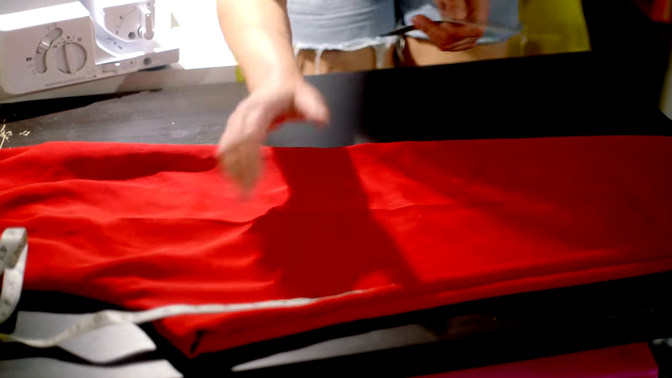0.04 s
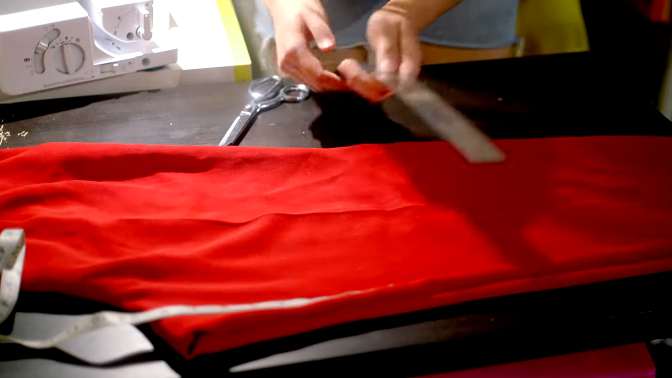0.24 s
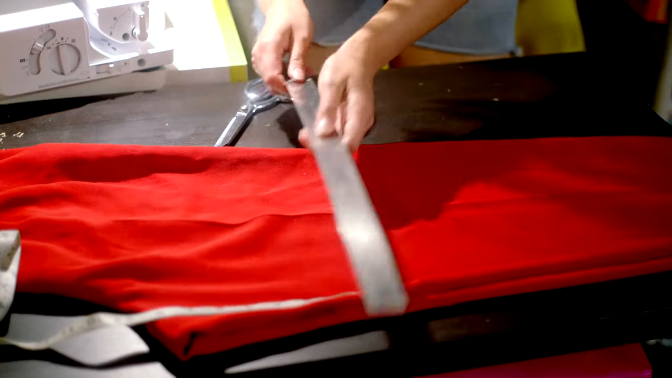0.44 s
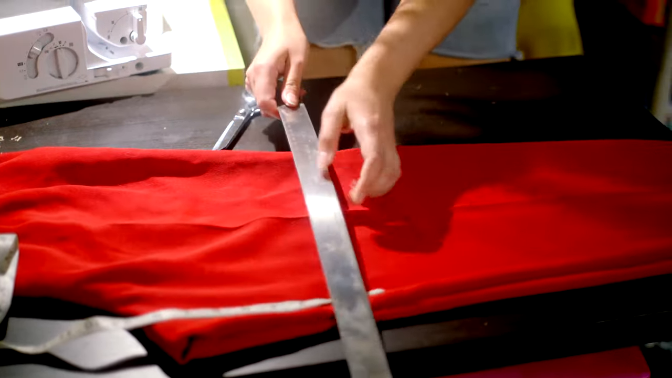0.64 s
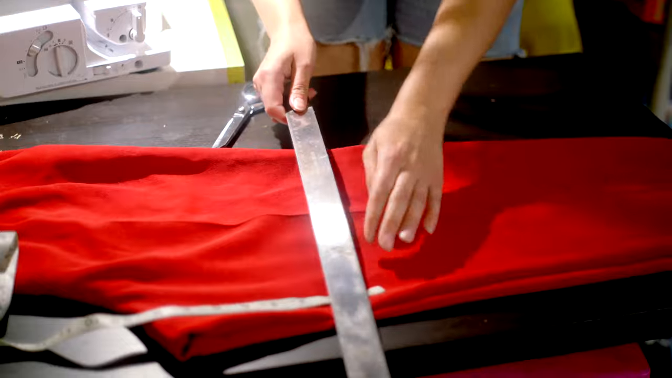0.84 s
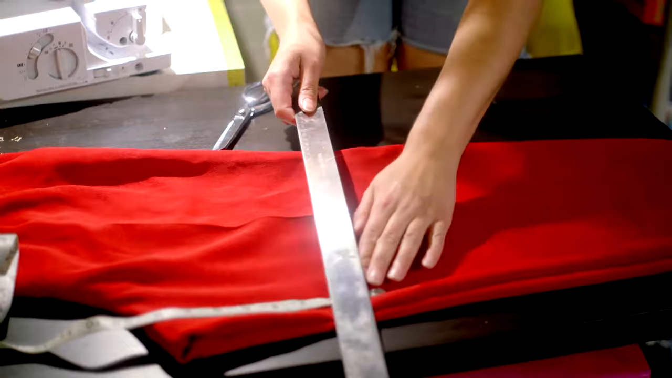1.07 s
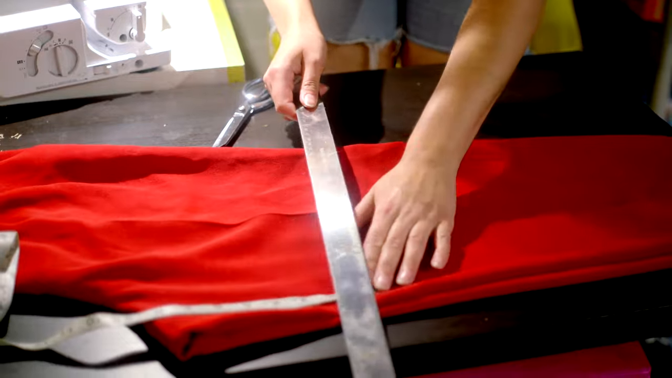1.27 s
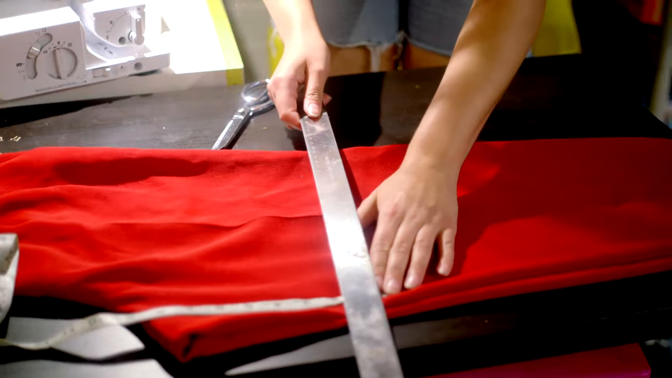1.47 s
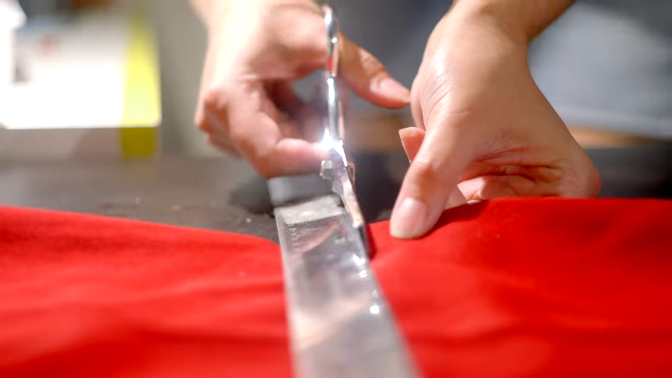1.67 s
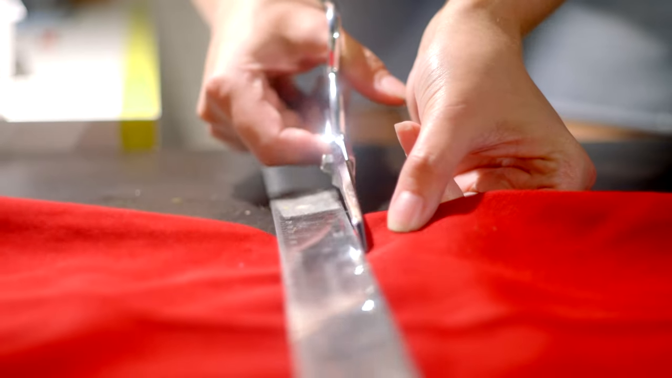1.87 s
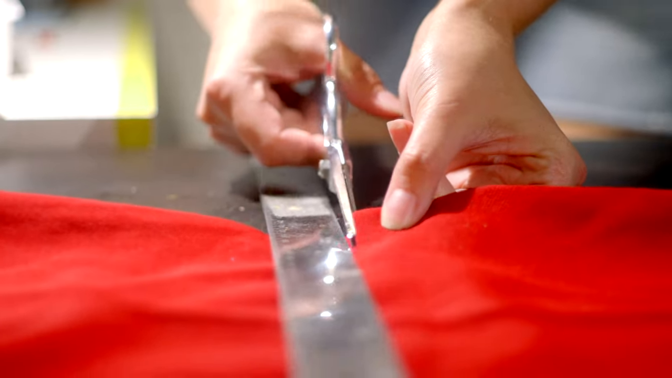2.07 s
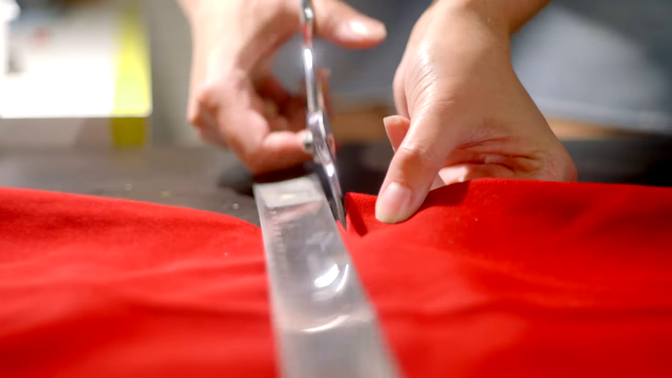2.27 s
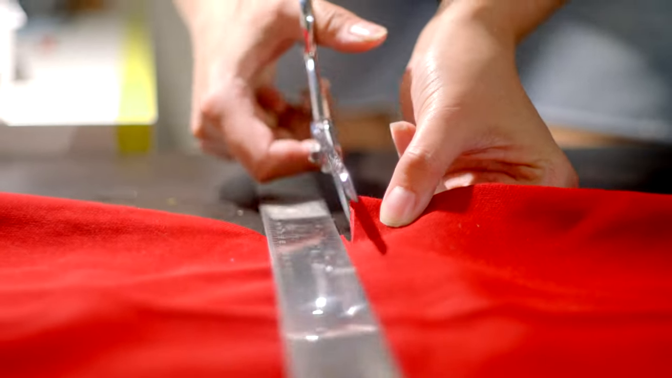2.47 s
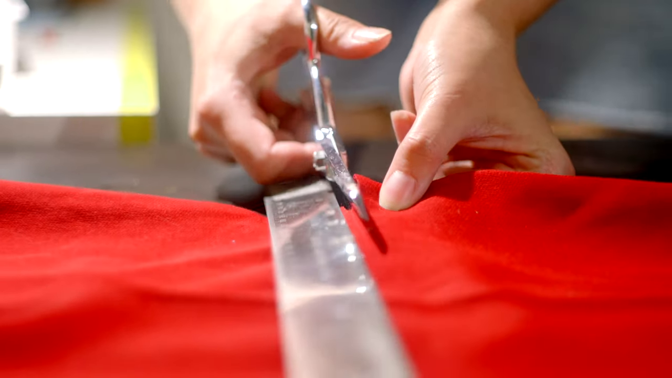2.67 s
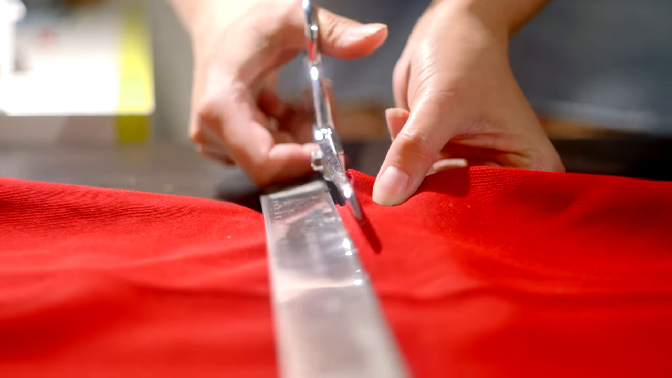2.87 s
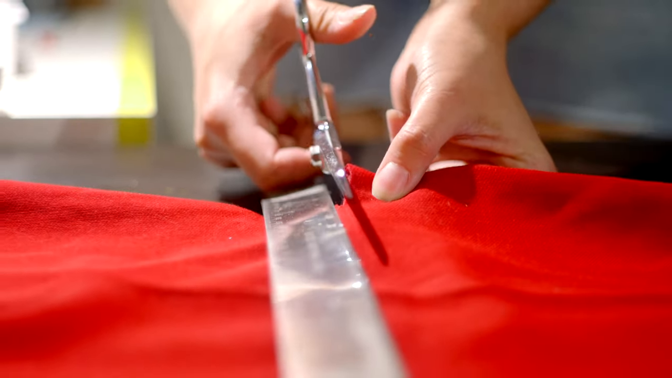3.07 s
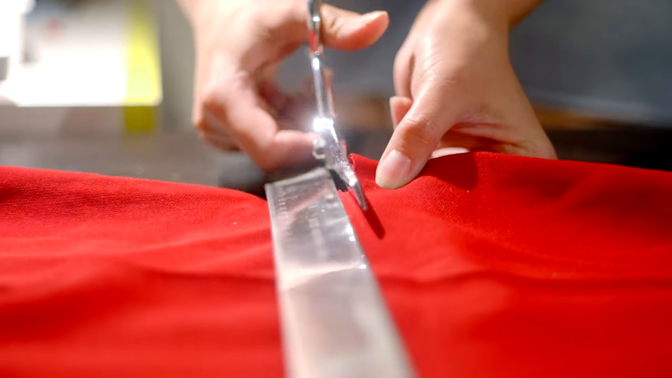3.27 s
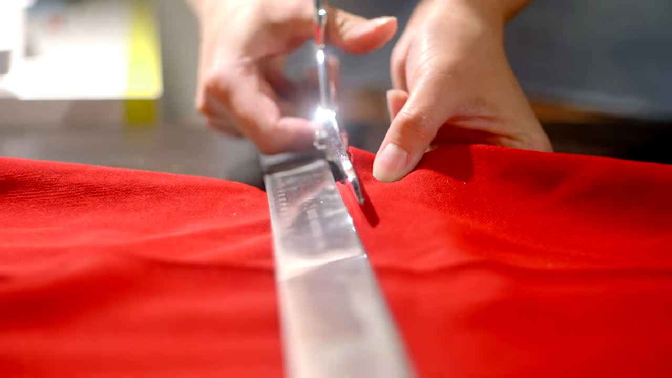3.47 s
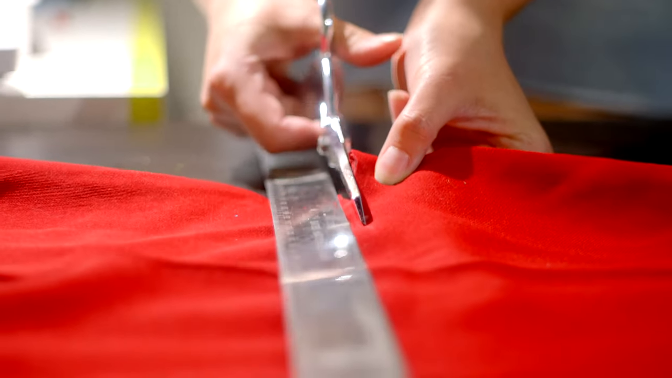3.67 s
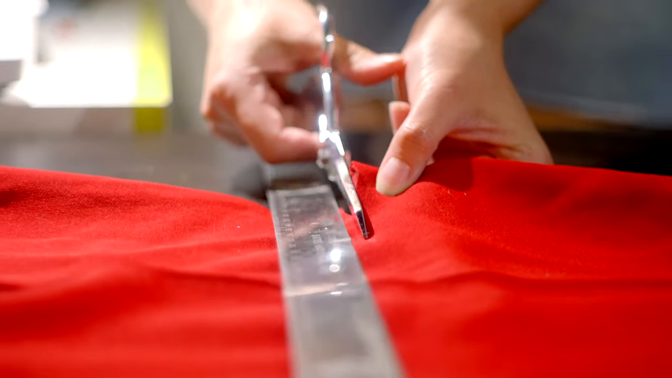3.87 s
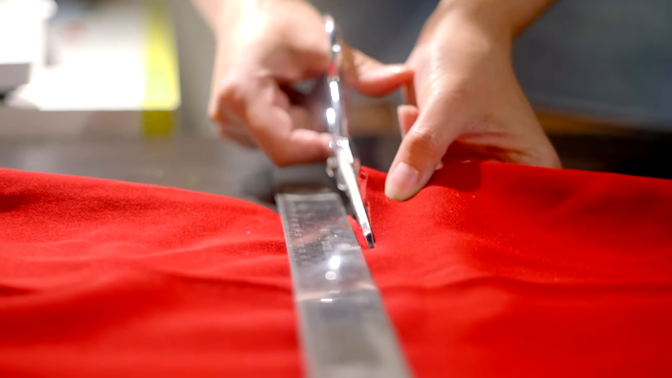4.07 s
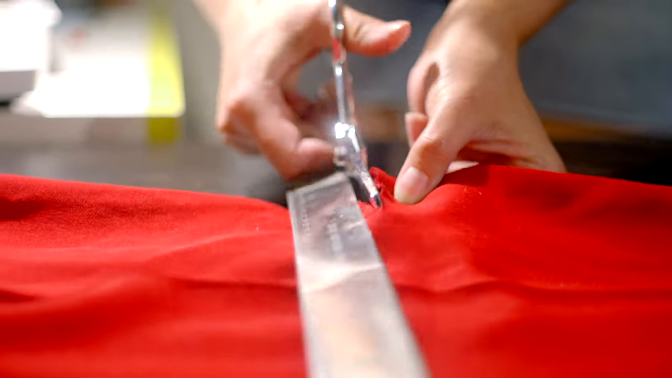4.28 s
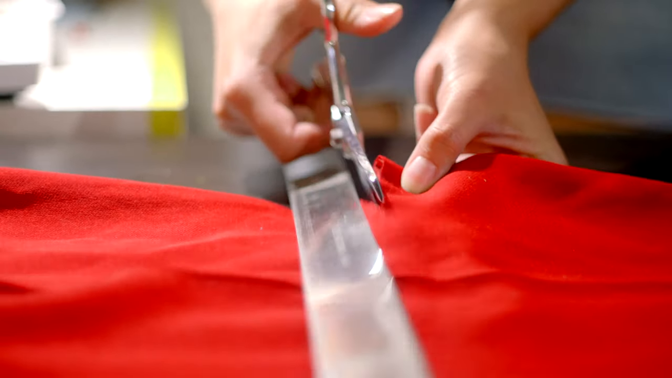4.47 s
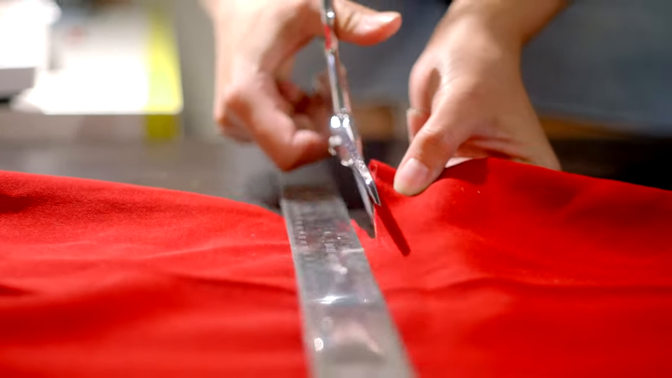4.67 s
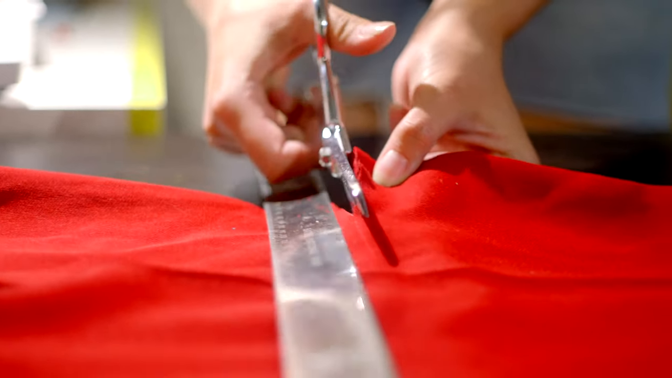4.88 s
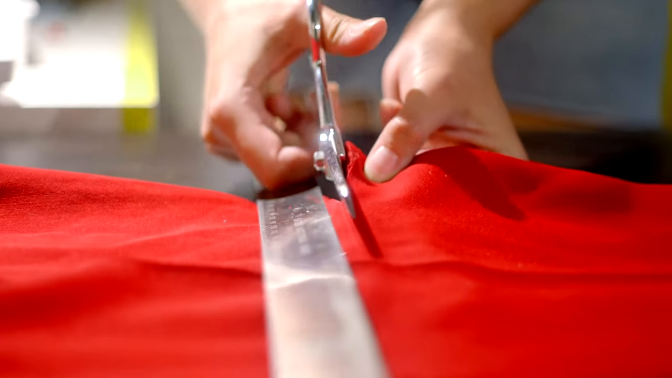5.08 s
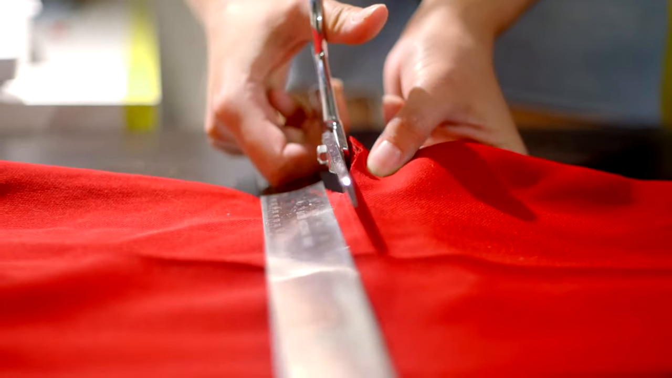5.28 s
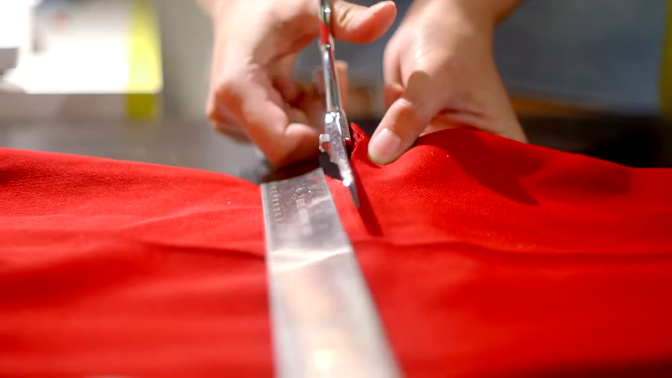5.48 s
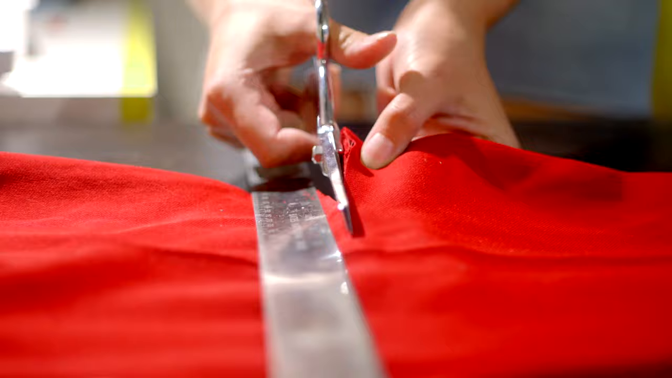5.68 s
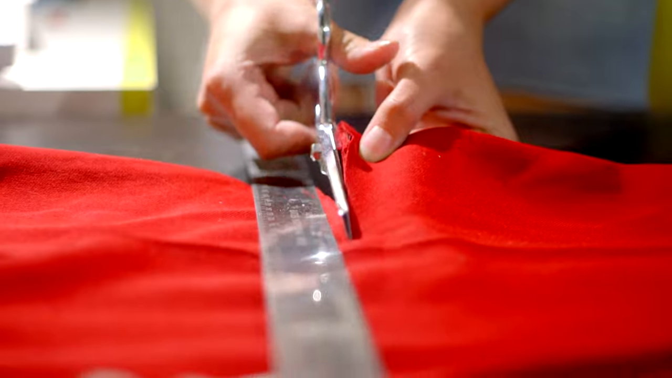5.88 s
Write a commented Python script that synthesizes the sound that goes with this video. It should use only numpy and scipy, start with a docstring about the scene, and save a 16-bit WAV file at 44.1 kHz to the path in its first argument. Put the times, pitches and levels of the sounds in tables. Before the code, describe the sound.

Tailor's shears on a cloth-covered wooden table, heard close and dry with a short indoor room tail. Light fabric rustling precedes one firm ruler slap and weaker settling taps. Slow cuts follow: rubbing steel, fibrous crunches resonating in the tabletop, bright metallic snaps at the ends of the first two. Between strokes the shears thump down, scrape brightly and push forward with a low, buzzing judder.

```python
"""Clothes brush over wool cloth in a small, faintly humming room, then a steel ruler slaps down and settles.
Tailor's shears cut in three slow strokes and begin a fourth: edges rub, and yarns part in crunching bites
that sound through the table top. The first two strokes end with the blades snapping shut.
The shears also knock on the table, mostly between strokes, scrape brightly and slide forward, juddering.
Random fibre catches and blows drive the resonances of table and blades; noise-built tails add the room."""
import sys
import numpy as np
from scipy import signal
from scipy.fft import rfft, irfft, next_fast_len
from scipy.io import wavfile
from scipy.ndimage import map_coordinates

SR = 44100
rng = np.random.default_rng(int(sys.argv[2]) if len(sys.argv) > 2 else 0)


def generate_wav(sig):
    """Save sig (samples, or channels by samples) to the path in sys.argv[1] as 16-bit PCM at SR."""
    pcm = np.round(np.clip(np.atleast_2d(sig).T, -1, 1) * 32767).astype(np.int16)
    wavfile.write(sys.argv[1], SR, pcm)


N = 261513
TIME = np.arange(N) / SR
SHORT = TIME[:SR // 6]  # time within one blow

# Levels in the tables are relative to their layer's own scaling.
# hands and clothes brushing over the wool: start_s, fastest_s, stop_s, level_db
BRUSH_MOVES = [(-1.4, 0.23, 0.6, -58), (0.98, 1.243, 2, -67.5)]
# ruler landing and settling: start_s, boom_db, clack_db, dullness_db
RULER_BLOWS = [(0.4723, -24, -23, 11), (.6585, -42.5, -39, 14), (.871, -52.5, -62, 14)]
# squeezes of the handles: start_s, end_s, gape_at_start, gape_at_end (0 shut to 1 wide),
# pressure_power (exponent of the build-up), table_db, steel_db
SQUEEZES = [(1.557, 1.8, 0.13, 0.075, 0.012, -49, -68.5), (1.784, 1.958, .14, .06, 0.068, -41, -60),
            (3.138, 3.271, 0.98, 0.99, .05, -48.5, -73.5), (3.268, 3.609, 1, .9, 0.086, -40, -63),
            (3.627, 3.975, 0.12, 0.068, .04, -44.5, -65.5), (5.275, 5.811, 1, .45, 0.48, -38.5, -58.5),
            (5.907, 6.0, .25, .2, .1, -39.5, -66.5)]
# runs of yarn bundles parting: first_bite_s, last_bite_s, bite_length_s, boom_db, crunch_db,
# crunch_from_hz, crunch_to_hz, fizz_db, growth_per_bite_db
YARN_RUNS = [(1.812, 1.812, 0.011, -22.5, -33, 570, 2410, -43.5, 0),
             (1.85, 1.869, 0.014, -27.5, -32.5, 573, 2400, -43, 3),
             (1.908, 1.925, .013, -30, -34.5, 576, 2400, -43.5, 3),
             (3.447, 3.445, 0.013, -42.5, -40.5, 570, 2390, -65, 0),
             (3.51, 3.54, 0.022, -35, -38.5, 600, 2420, -55, 5.5),
             (3.573, 3.574, 0.015, -26.5, -22.5, 970, 1610, -42.5, 0.5),
             (3.734, 3.731, 0.024, -42, -44, 570, 2405, -56, 0),
             (3.806, 3.807, 0.0076, -38, -40.5, 570, 2400, -61, -1),
             (3.866, 3.896, .014, -30, -35.5, 584, 2400, -50, 1.5),
             (3.924, 3.924, 0.0095, -26.5, -27.5, 650, 2410, -44.5, 0),
             (3.974, 3.973, .016, -28, -41, 570, 2381, -42, 0),
             (5.34, 5.34, 0.0091, -35.5, -49, 567, 2400, -68, 0),
             (5.531, 5.588, 0.027, -35, -34, 725, 2370, -50, 0),
             (5.635, 5.669, .017, -29.5, -30, 650, 2240, -50, -0.5),
             (5.708, 5.737, .016, -33.5, -32.5, 800, 2330, -49.5, 1.5),
             (5.774, 5.807, 0.014, -34.5, -29.5, 740, 2360, -51.5, 0)]
# blades meeting their stop: start_s, ring_db, thump_db
BLADE_STOPS = [(1.9669, -16, -26), (3.981, -19.5, -25.5)]
# table jolts from each snap: delay_s, boom_over_thump_db, clack_over_thump_db
SNAP_JOLTS = [(.001, 3, -5), (.015, 0, -15)]
# shears striking the table: start_s, boom_db, clack_db, clack_top_hz, dullness_db
TABLE_KNOCKS = [(2.178, -20, -26.5, 1830, 9), (2.2904, -28.5, -27, 2030, 6.5),
                (2.3208, -24.5, -43, 1290, 6.5), (2.36, -42.5, -47, 1820, 8), (3.6055, -44, -44, 2590, 2),
                (4.1378, -19.5, -24, 1960, 14.5), (4.297, -57, -64.5, 2214, 3.5),
                (4.4818, -29, -31, 2883, 2), (4.536, -40, -33.5, 1800, 10)]
# bright steel scrapes, blades springing apart or rattling on after a knock: centre_s, length_s, level_db
BRIGHT_SCRAPES = [(2.208, 0.04, -54), (4.161, 0.081, -67), (4.505, .045, -55.5)]
# lower blade pushed along the table: start_s, fastest_s, stop_s, table_db, scrape_db
BLADE_PUSHES = [(2.276, 2.36, 2.728, -29, -56.5), (2.805, 2.871, 3.08, -51, -78),
                (4.362, 4.443, 4.62, -29, -59.5), (4.553, 4.639, 5.004, -27.5, -55),
                (4.89, 4.973, 5.02, -44, -74), (5.0, 5.064, 5.165, -51, -78.5)]
# spells of stick-slip in the pushes: start_s, strongest_s, stop_s, slips_per_s (at the strongest),
# sag (slips per second lost each s), level_db
STICK_SLIP = [(2.31, 2.34, 2.8, 320, 100, -50), (4.43, 4.47, 4.53, 292, 1400, -37.5),
              (4.66, 4.75, 4.82, 260, 550, -38)]

# table top resonances: pitch_hz, width_hz, level_db
TABLE_MODES = [(111.6, 32, -6.5), (166, 50, -11.5), (277.6, 22, 0), (306.4, 51, 0), (412, 110, -1),
               (467.3, 76, 1), (541.4, 95, -3.5), (666.7, 76, -4), (740, 55, -1), (821, 70, -6.5),
               (897, 110, -7), (1055.5, 100, -8), (1291, 110, -8), (1360, 134, -6), (1553, 130, -16),
               (1711, 82, -17.5), (1829, 90, -18.5), (2005, 920, -29)]
# wide blades rubbing near the pivot: pitch_hz, width_hz, level_db
PIVOT_MODES = [(2568, 69, 7), (2791, 65, 9), (3100, 520, 1.5), (4050, 180, -1), (4523, 1100, -0.5),
               (5040, 330, -3.5), (5960, 400, -9.5), (6580, 840, -9.5), (7700, 370, -10), (8390, 350, -6),
               (9240, 370, -7.5), (9900, 490, -17), (11400, 500, -11.5), (12660, 1800, -21.5)]
# narrow blades rubbing near the tips: pitch_hz, width_hz, level_db
TIP_MODES = [(2715, 1500, -12), (3732, 210, 8.5), (3970, 420, 7.5), (4570, 600, -2.5), (5440, 600, -8),
             (6334, 500, -20), (7070, 350, 0), (8100, 600, -14.5), (10500, 1600, -23.5),
             (12500, 1200, -26.5)]
# ringing of the closed blades: pitch_hz, level_db, t60_s
CLOSED_BLADE_MODES = [(3780, -6.5, 0.038), (4220, 3.5, 0.016), (4644, 10, 0.0067), (5020, -7.5, 0.039),
                      (6080, -13.5, 0.034), (7200, -19, .025), (8290, 3.5, 0.012), (11300, -13.5, 0.014),
                      (12070, -5.5, 0.017), (12460, -11, 0.031), (14200, -18.5, .025), (16140, -12, .02)]

# steel contact colour: freq_hz, level_db (per Hz)
TICK_COLOUR = [(1000, -2.5), (1700, 6.5), (2800, -5.5), (3900, 1), (5000, -6), (6000, -9.5), (9000, -15.5),
               (12000, -22.5), (16000, -27.5)]
# blade dragging, heard through the table: freq_hz, level_db (per Hz)
DRAG_COLOUR = [(50, -17), (170, -5), (280, 6), (450, 3), (620, -3), (1000, -3.5), (1400, -2.5), (2200, -5),
               (5000, -22.5)]
# scrape of the dragged steel: freq_hz, level_db (per Hz)
SCRAPE_COLOUR = [(900, -13), (2000, 23), (2600, -4), (3200, 8), (4700, 1), (5900, -4), (8000, -2),
                 (11000, -24), (16000, -22)]
# brushed wool: freq_hz, level_db (per Hz)
WOOL_COLOUR = [(100, 2), (280, 10.5), (500, 3), (900, 2.5), (1700, -2.5), (5000, -7.5), (9000, -15),
               (15000, -22)]
# quiet hum of air: freq_hz, level_db (per Hz)
AIR_COLOUR = [(25, 0), (60, -6), (110, 0.5), (200, -8), (270, -2.5), (370, -11), (520, -9), (900, -16),
              (1250, -18), (1700, -24), (3000, -29.5), (7000, -35), (16000, -42)]
# decay of the room: freq_hz, t60_s
ROOM_DECAY = [(120, 0.16), (400, 0.29), (1000, 0.21), (3000, 0.26), (7000, 0.11), (15000, 0.034)]
# colour curves: freq_hz, level_db
CHATTER_COLOUR = [(500, -7.0), (1500, 18), (3000, 1.5), (6500, 4), (10000, 3), (16000, -7.5)]
RUB_COLOUR = [(40, -8), (110, -3.5), (200, -0.5), (450, 0), (700, -9.0), (1400, -6.0), (2500, -4.0), (5000, -17.0)]
RASP_COLOUR = [(500, -37), (900, -2), (1150, 0.5), (1370, 18), (1800, -4.0), (2500, -9), (5000, -29.5)]
BRIGHT_COLOUR = [(3000, 2.6), (6000, 9.3), (10000, 11), (15000, 4)]
ROOM_COLOUR = [(40, -19.5), (120, -7.5), (400, -16), (1200, -10.5), (4000, -13.5), (9000, -13.5), (15000, -11)]

RULER_TOP_HZ, THUD_DB = 1140, -17  # top of the ruler's clack; thud of its flat side over the boom
GRIP_S, RELEASE_S = .025, 0.012  # the hand takes up the handles; time constant of letting go
OPEN_S = .33  # time to spread the blades again
STEEL_POWER, SCRAPE_POWER = 1.5, 1.72  # steel grows faster than the table with pressure and with speed
WANDER, WANDER_PER_S = .015, 16  # rough share and pace by which the steel's resonances waver
BITES_PER_S, BITE_SCATTER_DB = 30, 0.5  # pace of a run; bundles differ in thickness
JOLT_TOP_HZ, JOLT_DULL_DB = 2100, 12.5
SPARKLE_LOSS = 2.43  # a dull contact loses this many times more dB in the sparkle than in the tick
BAND_LIMIT_HZ = 15900


def amp(db):
    """Decibels to gain."""
    return 10 ** (np.asarray(db) / 20)


def unit(x):
    """Scale to rms 1."""
    return x / np.sqrt(np.mean(x ** 2) + 1e-20)


def along(points, hz):
    """Read (Hz, value) points along a log frequency axis."""
    f, v = np.transpose(points)
    return np.interp(np.log(hz + 1), np.log(f + 1), v)


def wobble(rate):
    """A smooth random curve, rate knots a second."""
    return map_coordinates(rng.standard_normal(8000), [TIME * rate + 2], mode="mirror")


def filtered(x, response):
    """Shape x by a gain that is a function of frequency."""
    m = next_fast_len(len(x) + 8192)
    return irfft(rfft(x, m) * response(np.fft.rfftfreq(m, 1 / SR)), m)[:len(x)]


def colour(x, points):
    """Shape x by a curve of (Hz, dB) points."""
    return filtered(x, lambda hz: amp(along(points, hz)))


def body(modes, valley_db):
    """Causal impulse response with these resonances standing over a valley floor."""
    hz = np.fft.rfftfreq(len(SHORT), 1 / SR)
    peaks = sum(amp(db) ** 2 / (1 + (2 * (hz - centre) / width) ** 2) ** 2 for centre, width, db in modes)
    cepstrum = irfft(np.log(peaks + amp(valley_db) ** 2) / 2)
    # minimum phase: the energy comes first
    cepstrum[1:] *= 2 * (np.arange(1, len(cepstrum)) < len(cepstrum) / 2)
    return unit(irfft(np.exp(rfft(cepstrum))))


def through(force, answer):
    """Drive a body with a force."""
    return signal.fftconvolve(force, answer)[:len(force)]


def part(x, lo_hz, hi_hz, db, length):
    """One band of a blow, with the energy of db held for length seconds."""
    band = signal.butter(3, [lo_hz, min(hi_hz, SR / 2 - 100)], "band", fs=SR, output="sos")
    y = signal.sosfilt(band, x)
    return amp(db) * y * np.sqrt(length * SR / np.sum(y ** 2))


def add(track, s, sound):
    """Mix a sound in at s seconds."""
    space = track[max(round(s * SR), 0):][:len(sound)]
    space += sound[:len(space)]


def fibres(count, rate, spread_db):
    """Tiny catches of single fibres: random instants, random sizes."""
    chance, size = rng.random(count), rng.standard_normal((2, count))
    return (chance < rate / SR) * np.sign(size[0]) * amp(spread_db * size[1])


def swell(length):
    """A smooth hump that peaks 50 ms into a blow."""
    return np.exp(-((SHORT - .05) / (.42 * length)) ** 2)


def speed(start, fastest, stop):
    """A hand movement gathers speed and slows to rest: 0 to 1."""
    return np.interp(TIME, [start, fastest, stop], [0, 1, 0])


def rustle():
    """Fibre catches brush softly over the cloth, louder the faster the hand moves."""
    gain = sum(amp(db) * speed(start, fastest, stop) for start, fastest, stop, db in BRUSH_MOVES)
    catches = fibres(N, rate=8000, spread_db=1)
    return gain * unit(colour(catches, WOOL_COLOUR) * amp(1.3 * wobble(26.0)))


def air_hum():
    """The quiet hum of air: steady noise weighted to the bass."""
    return amp(-59) * unit(colour(rng.standard_normal(N), AIR_COLOUR))


def room(x):
    """Diffuse reflections build up after a few milliseconds; the top treble dies first."""
    hz, t, z = signal.stft(rng.standard_normal((4, SR // 2)), SR, nperseg=256)
    decay = amp(-60 * t / along(ROOM_DECAY, hz)[:, None])
    onset = 1 - np.exp(-t / 0.005)
    tails = signal.istft(z * decay * onset, SR, nperseg=256)[1]
    turn = (TIME // .3).astype(int) % len(tails)  # every 0.3 s of input takes the next tail
    wet = sum(through(x * (turn == k), tail / np.linalg.norm(tail)) for k, tail in enumerate(tails))
    return colour(wet, ROOM_COLOUR)


def knock(table, boom_db, clack_db, top_hz, dull_db):
    """Steel hits the table: one push and a few milliseconds of chatter."""
    chatter = rng.standard_normal(len(SHORT))
    force = chatter * amp(-60 * SHORT / 0.025)
    force[0] += 6
    wood = through(force, table * amp(-60 * SHORT / 0.2))  # the hand and the cloth damp the top
    edge = colour(chatter * amp(-60 * SHORT / 0.027), TICK_COLOUR)
    boom = part(wood, 100, 698, boom_db, .012)
    clack = part(wood, 677, top_hz, clack_db, .013)
    tick = part(edge, 1100, 4300, clack_db - dull_db, .01)
    sparkle = part(edge, 6300, 16000, clack_db - SPARKLE_LOSS * dull_db, .0055)
    return boom + clack + tick + sparkle


def ruler(table):
    """The flat ruler slaps the cloth with a knock and a low thud, then settles."""
    out = np.zeros(N)
    for s, boom_db, clack_db, dull_db in RULER_BLOWS:
        thud = part(table, 135, 233, boom_db + THUD_DB, 0.0092)
        add(out, s, knock(table, boom_db, clack_db, RULER_TOP_HZ, dull_db) + thud)
    return out


def pressure(start, end, power):
    """Pressure builds through a squeeze and drops when the hand lets go."""
    progress = np.clip((TIME - start) / (end - start), 0, 1)
    grip = np.clip((TIME - start) / GRIP_S, 0, 1)
    release = np.exp(-np.maximum(TIME - end, 0) / RELEASE_S)
    return progress ** power * grip * release


def gape(s):
    """How wide the shears stand: straight moves between the gapes at the ends of the squeezes."""
    points, last_end = [], 0
    for start, end, before, after, *_ in SQUEEZES:
        points += [(min(last_end + OPEN_S, start), before), (start, before), (end, after)]
        last_end = end
    return np.clip(np.interp(s, *np.transpose(points)), 0, 1)


def blades(force, s):
    """The crossing point runs from pivot to tips, and the steel's resonances change with it."""
    wide = gape(s)
    pivot = through(force, body(PIVOT_MODES, valley_db=-27.5))
    tips = through(force, body(TIP_MODES, valley_db=-25.5))
    return np.sqrt(wide) * pivot + np.sqrt(1 - wide) * tips


def waver(x):
    """The contact shifts along the edges and bends the steel's resonances up and down."""
    shift = WANDER * SR / (2 * WANDER_PER_S) * wobble(WANDER_PER_S)
    return map_coordinates(x, [np.arange(N) + shift], mode="mirror")


def shearing(table):
    """Edge rubs on edge and squeezes the cloth; wide blades rasp higher in the table."""
    table_gain = steel_gain = 0
    for start, end, _, _, power, table_db, steel_db in SQUEEZES:
        press = pressure(start, end, power)
        table_gain = table_gain + amp(table_db) * press
        steel_gain = steel_gain + amp(steel_db) * press ** STEEL_POWER
    force = fibres(N, rate=9000, spread_db=5.5) * amp(2.1 * wobble(90))
    wood = through(force, table)
    rub = unit(colour(wood, RUB_COLOUR))
    rasp = unit(colour(wood, RASP_COLOUR))
    wood = 0.82 * rub + 0.23 * gape(TIME) * rasp
    steel = unit(waver(blades(force * amp(1.3 * wobble(150)), TIME)))
    catches = amp(1.7 * wobble(55))  # small bundles catch and give way
    return catches * (table_gain * wood + steel_gain * steel)


def bites(table):
    """Bundles of yarn give way at an even pace, each in a swell of snaps that shakes table and blades."""
    out = np.zeros(N)
    for first, last, length, boom_db, crunch_db, foot_hz, top_hz, fizz_db, growth_db in YARN_RUNS:
        count = 1 + round(abs(last - first) * BITES_PER_S)
        for k, s in enumerate(np.linspace(first, last, count)):
            force = swell(length) * fibres(len(SHORT), rate=9000, spread_db=2.5)
            wood = through(force, table)
            boom = part(wood, 70, 620, boom_db, length)
            crunch = part(wood, foot_hz, top_hz, crunch_db, length)
            fizz = part(blades(force, s), 1900, 15000, fizz_db, length)
            level_db = growth_db * (k - (count - 1) / 2) + BITE_SCATTER_DB * rng.standard_normal()
            add(out, s - .052, amp(level_db) * (boom + crunch + fizz))  # the swell peaks 2 ms before s
    return out


def snaps():
    """The blade tips hiss past each other, hit the stop, ring and chatter; a dull thump joins in."""
    out = np.zeros(N)
    rise = np.linspace(0, 1, SR // 100)
    for s, ring_db, thump_db in BLADE_STOPS:
        hiss = unit(colour(rng.standard_normal(len(rise)), TICK_COLOUR))
        add(out, s - len(rise) / SR, amp(ring_db - 19.0) * rise * hiss)

        ring = 0
        for hz, db, t60 in CLOSED_BLADE_MODES:
            decay = amp(db + rng.normal(0, 1.2) - 60 * SHORT / t60)
            ring = ring + decay * np.sin(2 * np.pi * (hz * SHORT + rng.random()))
        crack = .6 * rng.standard_normal(len(SHORT)) * amp(-60 * SHORT / 0.038)
        add(out, s, part(ring + crack, 3100, 17000, ring_db + .5, 0.0045))

        chatter = rng.standard_normal(len(SHORT)) * amp(-60 * SHORT / 0.19)
        add(out, s, amp(ring_db - 22.5) * colour(chatter, CHATTER_COLOUR))

        # a push that swings back the other way
        push = (1 - np.exp(-SHORT / .001)) * (np.exp(-SHORT / .011) - 0.32 * np.exp(-SHORT / .08))
        add(out, s, 2 * amp(thump_db) * push * np.linspace(1, 0, len(SHORT)))
    return out


def knocks(table):
    """Each snap jolts the table and the shears land once more; they also strike it, mostly between strokes."""
    out = np.zeros(N)
    for s, _, thump_db in BLADE_STOPS:
        for delay, boom_db, clack_db in SNAP_JOLTS:
            jolt = knock(table, thump_db + boom_db, thump_db + clack_db, JOLT_TOP_HZ, JOLT_DULL_DB)
            add(out, s + delay, jolt)
    for s, *blow in TABLE_KNOCKS:
        add(out, s, knock(table, *blow))
    return out


def bright_scrapes():
    """Bright swells of tiny steel catches: blades springing apart, or rattling on after a knock."""
    out = np.zeros(N)
    for s, length, db in BRIGHT_SCRAPES:
        force = swell(length) * fibres(len(SHORT), rate=1900, spread_db=8)
        scrape = colour(blades(force, s), BRIGHT_COLOUR)
        add(out, s - .05, part(scrape, 2800, 16000, db, length))  # the swell peaks at s
    return out


def sliding(table):
    """The blade's back drags over the table, louder with speed; the steel scrapes along."""
    table_gain = scrape_gain = 0
    for start, fastest, stop, table_db, scrape_db in BLADE_PUSHES:
        pace = speed(start, fastest, stop)
        table_gain = table_gain + amp(table_db) * pace
        scrape_gain = scrape_gain + amp(scrape_db) * pace ** SCRAPE_POWER
    force = fibres(N, rate=14000, spread_db=3.0) * amp(1.1 * wobble(90))
    drag = unit(colour(through(force, table), DRAG_COLOUR))
    scrape = unit(colour(blades(force, TIME), SCRAPE_COLOUR))
    return amp(-4.0) * table_gain * drag + scrape_gain * scrape


def judder():
    """The pushed blade sticks and slips: an unsteady buzz whose pitch sags through each spell."""
    out = np.zeros(N)
    for start, strongest, stop, rate, sag, db in STICK_SLIP:
        slowing = rate - sag * (np.clip(TIME, start, stop) - strongest)
        phase = 2 * np.pi * np.cumsum(slowing * (1 + 0.0213 * wobble(120))) / SR
        slips = np.sin(phase) + 0.11 * np.sin(2 * phase) + 0.049 * np.sin(3 * phase)
        out += amp(db) * speed(start, strongest, stop) * unit(slips * amp(2.3 * wobble(68)))
    return out


def scene():
    """Everything on the table, the room's answer and its quiet hum of air."""
    table = body(TABLE_MODES, valley_db=-38.0)
    work = ruler(table) + shearing(table) + bites(table) + knocks(table)
    work += bright_scrapes() + sliding(table) + judder()
    shut = snaps()
    answer = room(work + amp(-13.5) * shut)  # the snaps excite the room less
    return (rustle() + air_hum() + work + shut + answer)[None]


def record(dry):
    """Round off the sharpest peaks and keep almost nothing above the band limit."""
    held = dry / (1 + (dry / .4) ** 6) ** (1 / 6)
    return np.array([filtered(x, lambda hz: 1 / np.sqrt(1 + (hz / BAND_LIMIT_HZ) ** 160)) for x in held])


dry = scene()
out = record(dry)
generate_wav(out)
```